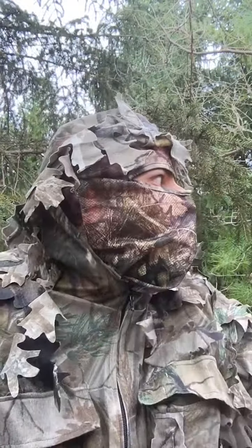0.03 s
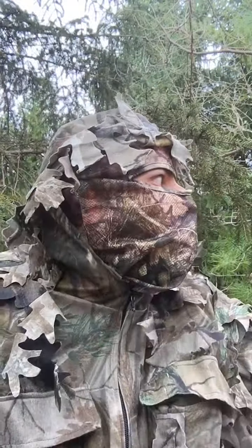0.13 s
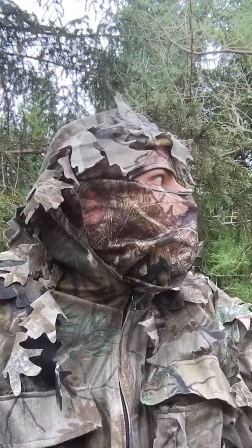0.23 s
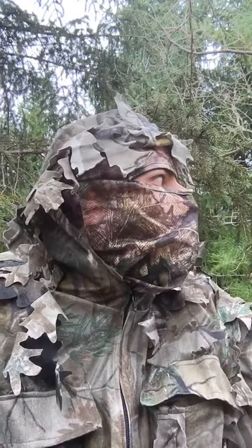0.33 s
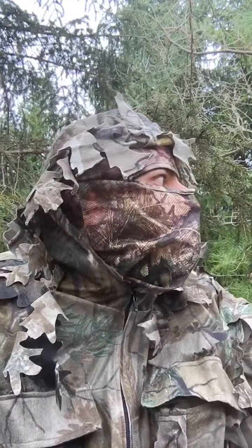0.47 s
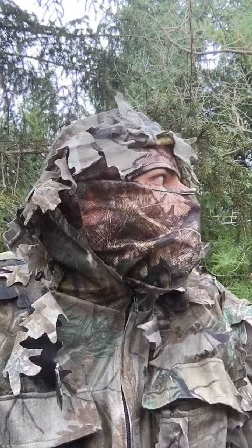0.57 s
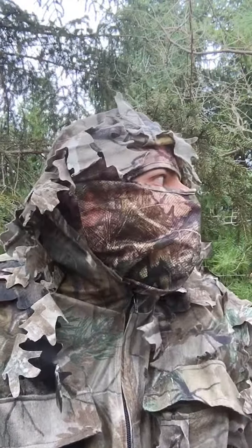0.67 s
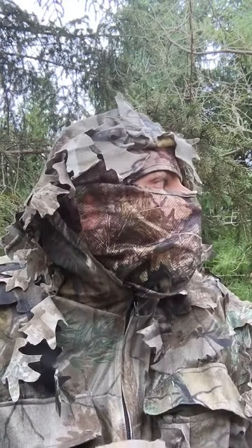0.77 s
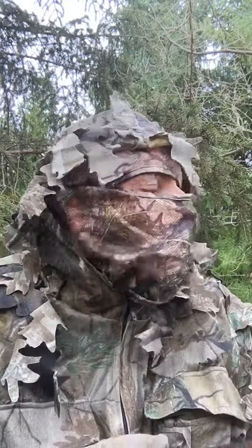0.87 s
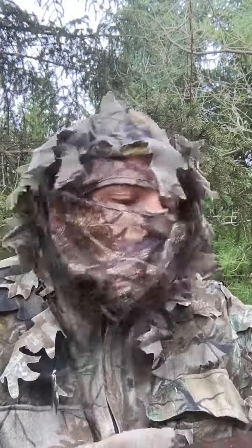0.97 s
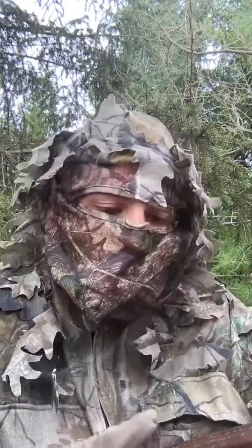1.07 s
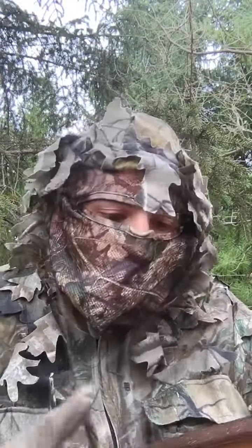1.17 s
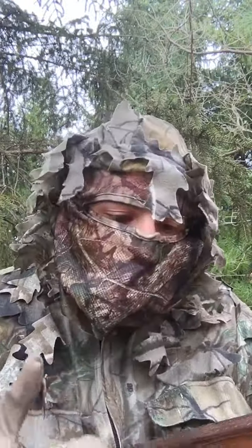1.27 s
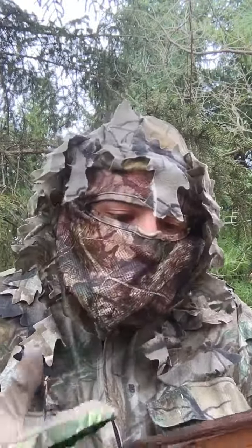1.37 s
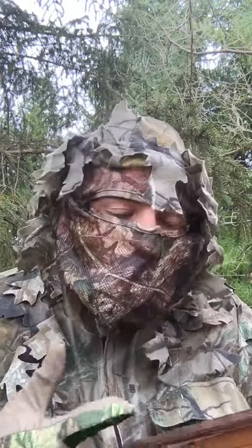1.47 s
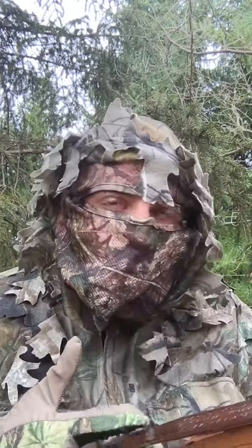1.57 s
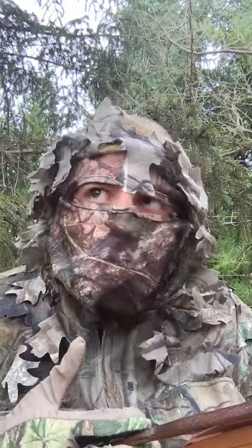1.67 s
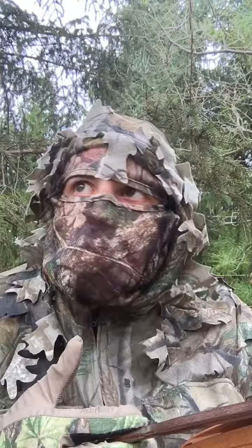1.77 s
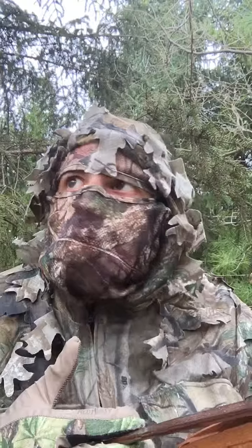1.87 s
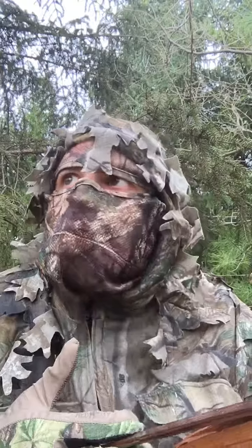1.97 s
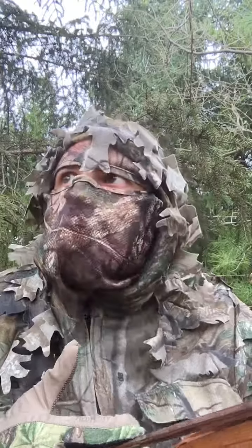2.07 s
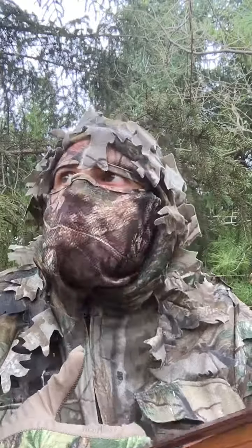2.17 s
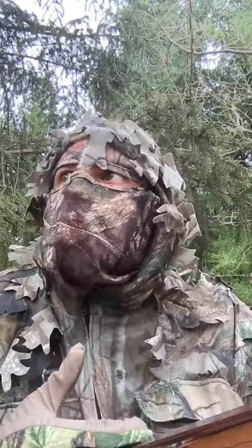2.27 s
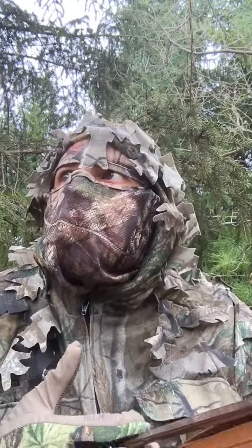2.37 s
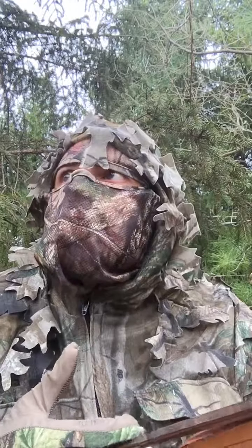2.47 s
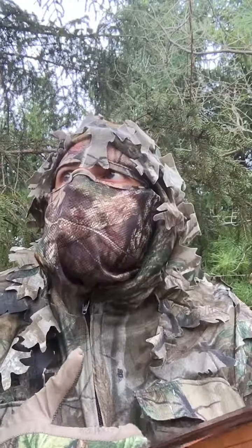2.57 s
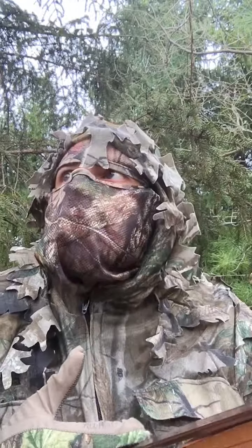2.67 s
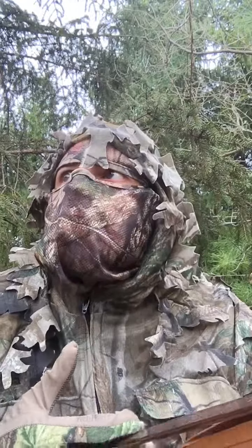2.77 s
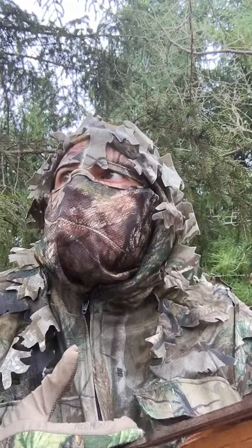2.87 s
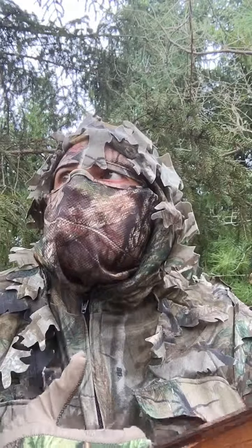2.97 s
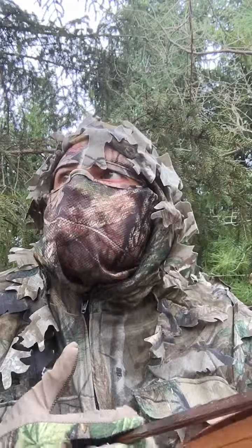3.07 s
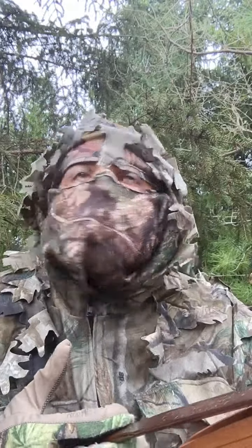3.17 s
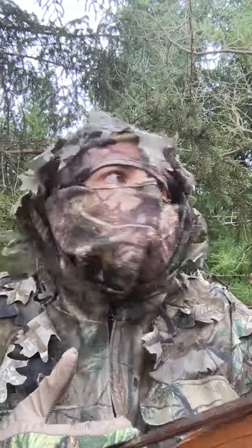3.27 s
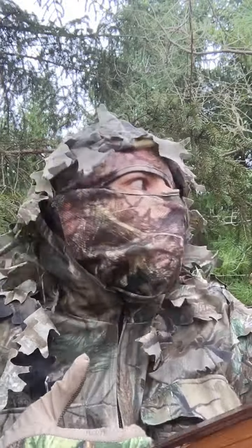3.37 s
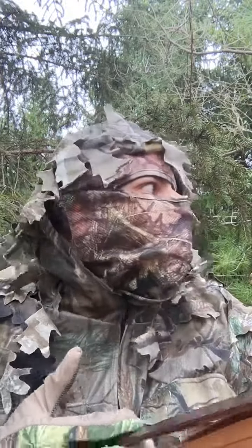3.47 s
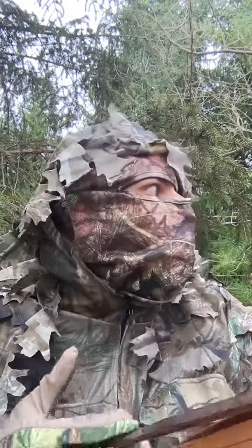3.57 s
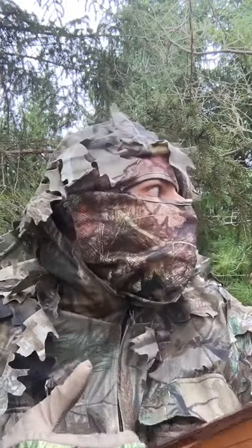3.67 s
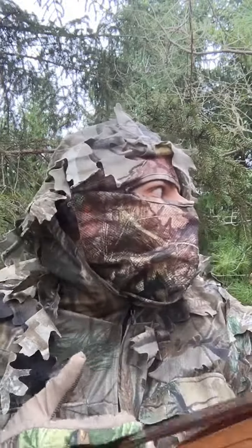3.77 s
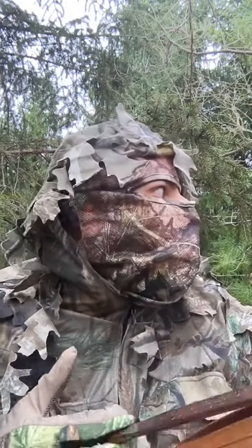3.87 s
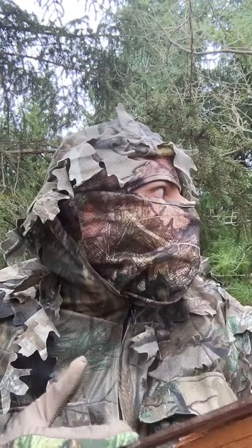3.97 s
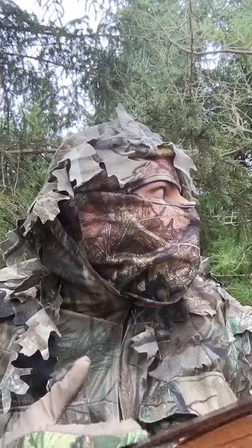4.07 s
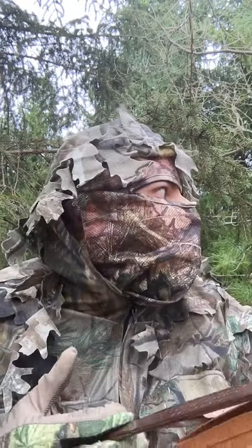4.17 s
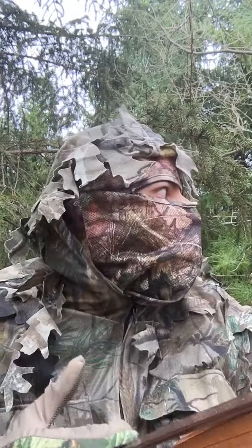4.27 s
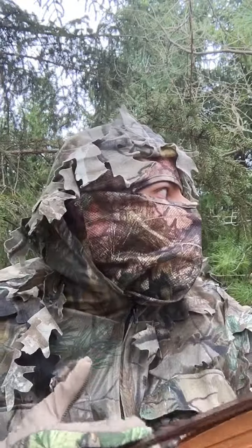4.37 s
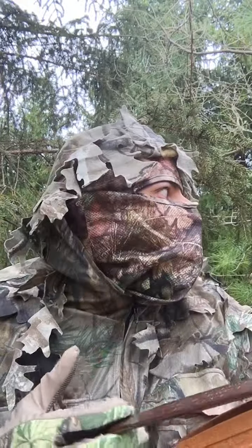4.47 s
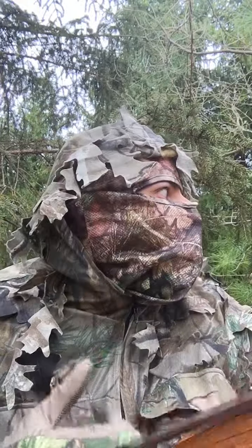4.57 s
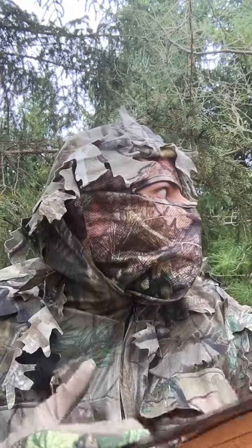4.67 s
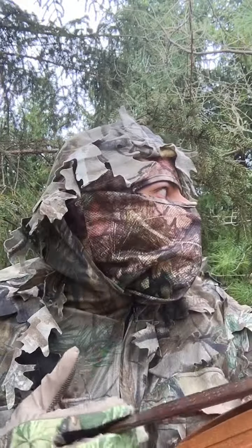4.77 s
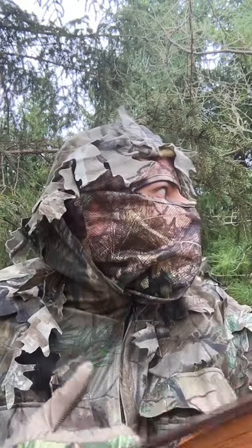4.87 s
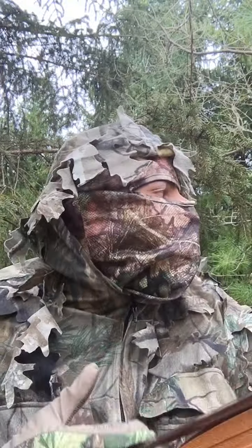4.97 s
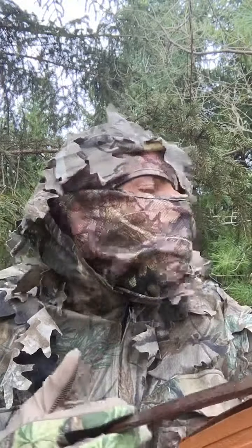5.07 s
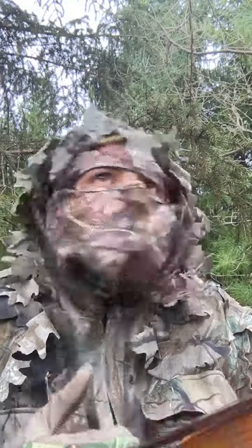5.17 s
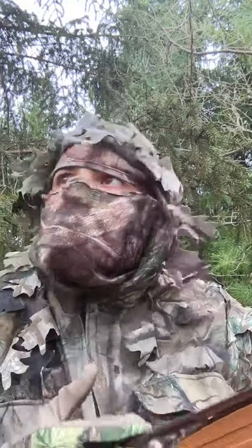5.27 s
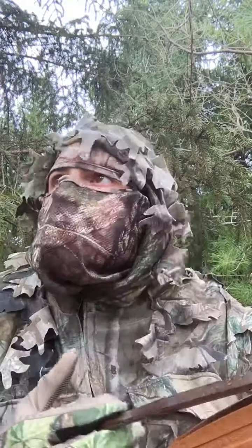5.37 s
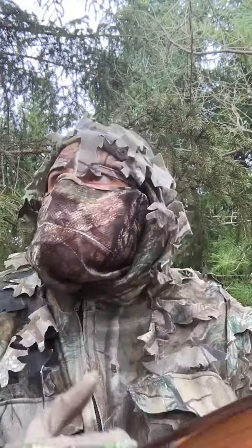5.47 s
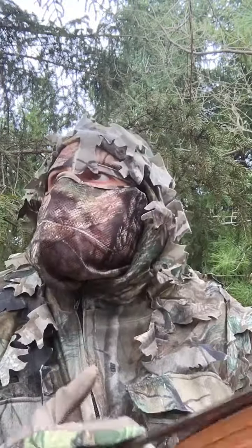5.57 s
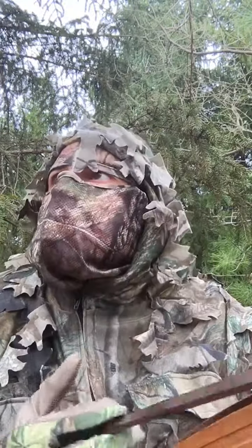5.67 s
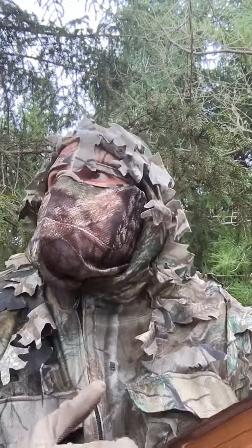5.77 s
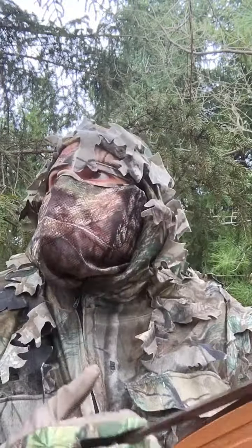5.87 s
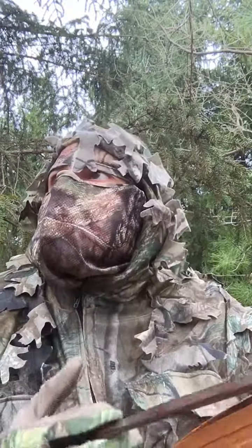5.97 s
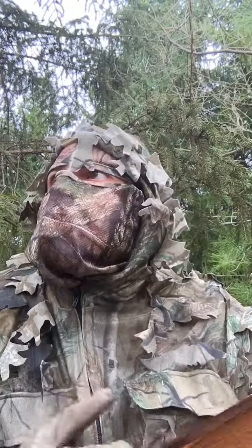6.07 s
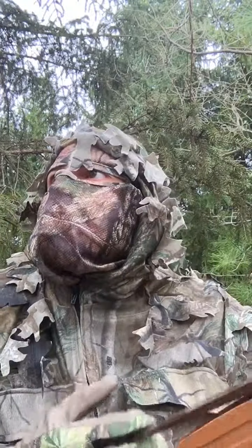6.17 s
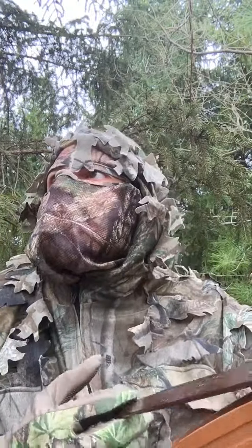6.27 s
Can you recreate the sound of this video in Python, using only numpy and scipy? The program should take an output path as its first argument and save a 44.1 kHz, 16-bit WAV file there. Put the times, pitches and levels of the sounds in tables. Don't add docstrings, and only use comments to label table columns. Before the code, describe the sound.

In a quiet wood, very close to the microphone, a wooden box call is handled: tiny dry creaks at its screw, then one light hollow tap. After a pause, small clicks lead into short chalky yelps like a hen turkey, weak at first, then loud and evenly spaced about three a second. Each starts with a woody knock and drops slightly in pitch. Faint echoes, low rumble and leaf hush surround them.

```python
import sys
import numpy as np
from scipy import signal
from scipy.fft import rfft, irfft, next_fast_len
from scipy.io import wavfile
from scipy.ndimage import uniform_filter1d, minimum_filter1d, map_coordinates

SR = 44100
rng = np.random.default_rng(int(sys.argv[2]) if len(sys.argv) > 2 else 0)


def field_ratio(decibels):
    return 10 ** (np.asarray(decibels, dtype=float) / 20)


def materialize(psi):
    bounded = np.clip(np.atleast_2d(psi).T, -1, 1)
    quanta = np.round(bounded * 32767).astype(np.int16)
    wavfile.write(sys.argv[1], SR, quanta)


N = 278182

# (start [s], length [s], time to the drop into the slow rate [s],
# fast slip rate [Hz], slow slip rate [Hz])
STROKES = [(2.304, .024, .009, 730, 632), (2.627, .102, .07, 772, 650), (3.0355, .042, .013, 735, 662),
           (3.395, .084, .042, 735, 676), (3.774, .026, .007, 810, 638), (4.088, .043, .008, 720, 674),
           (4.381, .054, .015, 735, 667), (4.676, .062, .045, 778, 650), (4.975, .063, .028, 755, 678),
           (5.265, .057, .022, 720, 662), (5.564, .064, .047, 775, 672), (5.842, .064, .035, 752, 668),
           (6.142, .059, .023, 740, 660)]
# (level [dB], roughness [0-1], edge [dB], cavity [dB], letting go [dB])
GRIPS = [(-14, 0.11, -8, -8.5, 12.5), (-12.5, .02, -5, -8.5, 5), (-8.5, .33, 1, -7.5, 14),
         (-9.5, 0, 10, -7.5, 7), (-7.5, 0.4, -1.5, -11, 14), (-8, .1, 8, -8, 13.5),
         (-8.5, 0.3, 4.5, -8.5, 8), (-6, 0, 6.5, -8.5, 10.5), (-7.5, .12, 8.5, -6, 21.5),
         (-5.5, .2, 5.5, -11, 20.5), (-6, 0.2, 7.5, -17.5, 19), (-7.5, 0.1, 7, -9, 19),
         (-8, .15, 1, -8, 18)]
# (frequency [Hz], width [Hz], level [dB])
SLIDING_MODES = [(683, 260, -7), (1328.3, 217, 6.5), (1694, 170, -2), (1870, 250, -2.5), (2332, 240, -0.5),
                 (2577, 160, -4), (3480, 190, 0), (3746, 130, 2.5), (4773, 120, -11), (5228, 260, -11),
                 (5877, 230, -8.5), (6500, 430, -17.5), (8210, 170, -18), (8910, 330, -22),
                 (11500, 960, -46.5)]
# (frequency [Hz], width [Hz], level [dB])
HELD_MODES = [(980, 83, -1.5), (1260, 150, 0), (1690, 77, 6.5), (2590, 230, -14.5), (2720, 41, -26),
              (3150, 130, -11), (3440, 40, -45), (4300, 900, -24), (5530, 310, -32.5), (5800, 210, -24),
              (8200, 1500, -70)]


def unit(x):
    return x / np.sqrt(np.mean(x ** 2) + 1e-20)


def along(points, hz):
    f, v = np.transpose(points)
    return np.interp(np.log(hz + 1), np.log(f + 1), v)


def smooth_rise(u, over):
    return (1 + np.tanh(u / over / 2)) / 2


def filtered(x, response):
    m = next_fast_len(N + SR // 2)
    return irfft(rfft(x, m) * response(np.fft.rfftfreq(m, 1 / SR)), m)[..., :N]


def modes(table):
    def response(f):
        total = 0
        for k, (center, width, db) in enumerate(table):
            resonance = 1j * f * width / (center * center - f * f + 1j * f * width)
            total = total + (-1) ** k * field_ratio(db) * resonance
        return total
    return response


def soft_top(response, corner_hz):
    return lambda f: response(f) / (1 + 1j * f / corner_hz) ** 2


def pulses(times, sizes):
    at = np.asarray(times) * SR
    index = np.floor(at).astype(int)[:, None] + np.arange(-7, 9)
    gap = index - at[:, None]
    shape = np.sinc(gap) * np.cos(np.pi * gap / 16) ** 2
    weighted = shape * np.asarray(sizes)[:, None]
    return np.bincount(index.ravel(), weighted.ravel(), N + SR)[:N]


def edged(soft, sharp, table, corner_hz):
    wood = modes(table)

    def high(f):
        return (1j * f / corner_hz / (1 + 1j * f / corner_hz)) ** 2
    low_part = filtered(soft, lambda f: wood(f) * (1 - high(f)))
    return low_part + filtered(sharp, lambda f: wood(f) * high(f))


def yelps():
    # (frequency [Hz], width [Hz], level [dB])
    cavity_modes = [(917, 88, 9.5), (860, 20, -15.5)]
    soft, sharp, deep, swing, gritty = np.zeros((5, N))
    for row, press in zip(STROKES, GRIPS):
        s, hz, db, rough, edge_db, cavity_db = stroke(row, press)
        t = np.arange(s[0], s[-1], 1 / SR)
        turns = np.cumsum(np.interp(t, s, hz)) / SR
        when = np.interp(np.arange(int(turns[-1]) + 1), turns, t)
        chance = rng.standard_normal((len(when), 3))
        r = np.clip(np.interp(when, s, rough), 0, 1)
        jitter = (0.006 + 0.3 * r ** 1.7) * chance[:, 0]
        when = when + jitter / np.interp(when, s, hz)
        size = field_ratio(np.interp(when, s, db) + 28.0) * np.abs(1 + 0.5 * r * chance[:, 1])
        slip_edge_db = np.interp(when, s, edge_db)
        soft += pulses(when, size)
        sharp += pulses(when, size * field_ratio(slip_edge_db + 5.1 * chance[:, 2] * r))
        gritty += pulses(when, size * field_ratio(slip_edge_db) * (0.25 + r))
        deep += pulses(when, size * field_ratio(np.interp(when, s, cavity_db)))

        steadiness = (1 - np.clip(np.interp(t, s, rough), 0, 1)) ** 2
        steadiness = steadiness * np.clip((s[-1] - t) / 0.0016, 0, 1)
        swing_size = field_ratio(np.interp(t, s, db - 1.3 * edge_db) - 2.5) * steadiness
        swing[round(s[0] * SR):][:len(t)] = swing_size * np.sin(2 * 2 * np.pi * turns + 1.35)

    drag = signal.lfilter([0.05], [1, -0.95], gritty)
    wall = edged(soft, sharp + 1.8 * drag * rng.standard_normal(N), SLIDING_MODES, corner_hz=3000)
    wall = filtered(wall, lambda f: 1 / (1 + (1j * f / 14000)) ** 2)

    def fizz_band(f):
        return field_ratio(-27.5) / (1 + (7000 / (f + 1)) ** 6) / (1 + (f / 12000) ** 4)
    fizz = filtered(drag * rng.standard_normal(N), fizz_band)
    cavity = filtered(deep, soft_top(modes(cavity_modes), corner_hz=2460))
    return wall + fizz + cavity + swing


def stroke(row, grip):
    # (time [s], step of the fast rate [Hz], duration [s], step of the edge [dB])
    catches = [
        (2.653, -48, .005, 3),
        (2.682, 25, .001, -2),
        (3.417, 48, .002, -4),
        (4.696, 88, .002, -11),
        (5.59, 15, .001, 0),
        (5.601, -30, .001, 3),
        (6.147, 45, .001, 0),
        (6.152, -45, .002, 8),
    ]
    start, length, drop_s, fast_hz, slow_hz = row
    db, rough, edge_db, cavity_db, _ = grip
    u = np.arange(0, length, 1 / SR)
    forming = np.exp(-u / length / 0.1)
    failing = np.exp(-((1 - u / length) / 0.16) ** 2)
    slow = smooth_rise(u - drop_s, 0.0022)
    dropping = 4 * slow * (1 - slow)
    shake = map_coordinates(rng.standard_normal((3, 40)), [np.arange(3)[:, None] + 0 * u, [u * 150] * 3])
    jump_s, jump_hz = 6.177, 990
    jumped = smooth_rise(start + u - jump_s, 0.0004)

    bite = 0
    catch_edge_db = 0
    fast_hz = fast_hz + 70 * np.exp(-u / 0.007)
    for s, step_hz, over, step_db in catches:
        if start < s < start + length:
            since = u - (s - start)
            fast_hz = fast_hz + step_hz * smooth_rise(since, over)
            catch_edge_db = catch_edge_db + step_db * smooth_rise(since, over)
            if step_hz > 0:
                bite = bite + np.exp(-(since / 0.003) ** 2)

    sagging_hz = slow_hz - 650 * (u - drop_s)
    hz = ((1 - slow) * fast_hz + slow * sagging_hz) * (1 + 0.01 * shake[0])
    hz = hz + (jump_hz - hz) * jumped
    db = db - 4.5 * forming - 10 * failing + 1.3 * shake[1] + 2 * bite
    rough = rough + 0.55 * forming + 0.1 * dropping + 0.4 * failing ** 2 + 0.25 * bite + 0.3 * jumped
    edge_db = edge_db + (1 - slow) * catch_edge_db
    edge_db = edge_db - 8.5 * forming - 3.5 * slow - 7.5 * failing + 2.5 * shake[2]
    cavity_db = cavity_db + 3 * forming + 4.5 * slow + 13 * failing - jumped
    return start + u, hz, db, rough, edge_db, cavity_db


def releases():
    # (frequency [Hz], width [Hz], level [dB])
    freed_modes = [(780, 120, -1), (1090, 33, 3.5), (1730, 90, -13), (2400, 210, -7.5), (3830, 220, -15.5),
                   (5760, 300, -25.5)]
    ends = np.array([row[0] + row[1] for row in STROKES])
    let_go_db = np.transpose(GRIPS)[-1]
    force = pulses(ends, field_ratio(let_go_db)) + pulses(ends + 0.006, field_ratio(let_go_db - 8))
    t = np.arange(SR // 20) / SR
    trickle = np.convolve(pulses(ends, field_ratio(let_go_db - 41)), 1 / (1 + (t / 0.011) ** 4))[:N]
    ring = filtered(force, soft_top(modes(freed_modes), corner_hz=8000))
    return ring + filtered(trickle * rng.standard_normal(N), modes(SLIDING_MODES))


def knocks():
    # (time
    # [s], peak level [dB], low mode [dB], edge [dB])
    slips = [(2.211, -26.5, 14, 1), (2.2241, -20.5, 19, -15.5), (2.246, -42, -10, 10),
             (2.6212, -27.5, 3.5, 0), (2.627, -10.5, -3, -2.5), (2.632, -6, -5, 6), (2.636, -6, -6.5, -0.5),
             (2.9902, -13, -0.5, 2.5), (2.995, -27, 13.5, 1), (2.9992, -1.5, 2, 8.5),
             (3.0364, -8.5, 2, 3.5), (3.3904, -13, -1.5, 5.5), (3.3959, 6, -2.5, 0),
             (3.7235, -6.5, 12.5, 8.5), (3.7328, 6.5, 10, -3), (4.0834, 1.5, 8.5, 5), (4.3808, -5, 2.5, 4),
             (4.671, 1.5, 6, -3.5), (4.9687, 1, 8, 2.5), (5.2639, -3.5, -3.5, 8), (5.561, 4, 1.5, -4.5),
             (5.839, -1.5, -8.5, -12.5), (6.136, -14.5, -8, 18.5), (6.141, 9, -17, -10)]
    s, db, low_db, edge_db = np.transpose(slips)
    decay = field_ratio(-60 * np.arange(SR // 40) / SR / 0.0082)
    tear = np.convolve(pulses(s, field_ratio(db + edge_db + 17)), decay)[:N]
    upper = edged(pulses(s, field_ratio(db + 31.5)), tear * rng.standard_normal(N), HELD_MODES[1:], corner_hz=2530)
    upper = filtered(upper, lambda f: 1 / (1 + 1j * f / 7000) ** 2)
    lower = filtered(pulses(s, field_ratio(db + low_db + 28.5)), soft_top(modes(HELD_MODES[:1]), corner_hz=3000))
    return upper - lower


def strain_hiss():
    starts = pulses([row[0] - 0.03 for row in STROKES[1:]], np.ones(len(STROKES) - 1))
    strain = np.convolve(starts, np.linspace(0, 1, 1100) ** 1.5)[:N]
    return field_ratio(-42) * strain * unit(filtered(rng.standard_normal(N), modes(HELD_MODES)))


def lid_tap():
    # (time [s], peak level [dB])
    blow = (1.6105, -23)
    # (frequency [Hz], width [Hz], level [dB])
    lifted_modes = [(690, 150, -14), (1000, 250, -13), (1270, 45, 0), (1600, 200, -6), (2080, 120, -10),
                    (2900, 200, -18), (3680, 150, -12), (5100, 300, -20), (6300, 400, -19),
                    (8000, 2000, -30)]
    ring = filtered(pulses([blow[0]], [1]), modes(lifted_modes))
    return field_ratio(blow[1]) * ring / np.abs(ring).max()


def creaks():
    # (time [s], peak level [dB], length [s])
    creeps = [(.51, -56, .004), (.5435, -41, .0015), (.5934, -51, .005), (.6074, -48, .005),
              (.7565, -53, .012), (.781, -49, .004), (.959, -48, .003), (.978, -43, .009), (1.0, -50, .003),
              (1.017, -43, .012), (1.031, -41, .007), (1.059, -35, .007), (1.067, -38, .025),
              (1.098, -38, .017), (1.123, -38, .003), (1.127, -41, .005), (1.583, -53, .008)]
    # (frequency [Hz], width [Hz], level [dB])
    screw_modes = [(830, 80, -6), (1200, 110, -4), (1900, 250, -9), (2860, 180, 0), (3400, 200, -1),
                   (4400, 500, -7), (5400, 250, -2), (6300, 500, -6), (10300, 3000, -20)]
    force = np.zeros(N)
    t = np.arange(2000) / SR
    for s, db, length in creeps:
        grit = rng.standard_normal((2, len(t)))
        burst = field_ratio(db + 4 * grit[1]) * grit[0] / (1 + (t / length) ** 4)
        force[round(s * SR):][:len(t)] += burst
    return field_ratio(4.5) * filtered(force, modes(screw_modes))


def echoes(x, t60_of, delay):
    hz, t, z = signal.stft(rng.standard_normal(SR), SR, nperseg=256)
    tail = signal.istft(z * field_ratio(-60 * t / t60_of(hz)[:, None]), SR, nperseg=256)[1]
    late = np.pad(x, (round(delay * SR), 0))
    return signal.fftconvolve(late, tail / np.linalg.norm(tail))[:N]


def bird():
    start_s, length_s, gap_s = 0.11, 0.031, 0.129
    start_hz, fall_hz_per_s = 6300, 71000
    t = np.arange(N) / SR
    u = t - start_s
    shape = np.clip(np.minimum(u, length_s - u) / 0.0046, 0, 1)
    shape = shape * (1 - np.exp(-((t - gap_s) / 0.0062) ** 2))
    return field_ratio(-62) * shape * np.sin(2 * np.pi * (start_hz * u - fall_hz_per_s * u ** 2 / 2))


def rush(spectrum, patchy_db):
    z = signal.stft(rng.standard_normal(N + SR), nperseg=512)[2]
    field = uniform_filter1d(rng.standard_normal(z.shape), 6, 0)
    field = uniform_filter1d(field, 14, 1)
    noise = signal.istft(z * field_ratio(patchy_db * unit(field)), nperseg=512)[1][:N]
    return unit(filtered(noise, lambda f: field_ratio(along(spectrum, f))))


def air():
    # (time [s], level [dB])
    rumble_levels = [(0, -56), (1.8, -58), (2.8, -60), (4.4, -62), (6.31, -65.5)]
    # (frequency [Hz], density [dB per Hz])
    rumble_spectrum = [(12, -48.5), (25, -9.5), (45, 3.5), (70, 0), (120, -4.5), (200, -16), (320, -25),
                       (600, -63.5)]
    # (time [s], level [dB])
    leaf_levels = [(1.75, -67.5), (2.43, -70), (3.14, -64.5), (6.31, -67.5)]
    # (frequency [Hz], density [dB per Hz])
    leaf_spectrum = [(120, -29), (200, -14), (350, -8.5), (500, -7.5), (800, -8.5), (1500, -10.5),
                     (2200, -13.5), (3500, -16.5), (6000, -19), (9000, -27), (13000, -33), (15500, -37)]
    t = np.arange(N) / SR
    rumble = field_ratio(np.interp(t, *np.transpose(rumble_levels))) * rush(rumble_spectrum, patchy_db=1.2)
    leaf_gain = field_ratio(np.interp(t, *np.transpose(leaf_levels)) + 1.5)
    return rumble + leaf_gain * rush(leaf_spectrum, patchy_db=1.5)


def scene():
    # (frequency [Hz], reverberation time t60 [s])
    trunk_decay = [(600, .35), (1300, .4), (1650, 1.0), (2300, .35), (4000, .25), (10000, .15)]
    box = yelps() + releases() + knocks() + strain_hiss() + lid_tap() + creaks()
    box = filtered(box, lambda f: (1j * f / 420 / (1 + 1j * f / 420)) ** 4)
    near = field_ratio(-27) * echoes(box, lambda hz: 0.055 + 0 * hz, delay=0.009)
    far = field_ratio(-51) * echoes(box, lambda hz: along(trunk_decay, hz), delay=0.03)
    return (box + near + far + bird() + air())[None]


def low_pass(x):
    return signal.sosfilt(signal.butter(12, 16360, fs=SR, output="sos"), x)


def record(dry):
    need = np.minimum(1, 1.08 / (np.abs(dry) + 1e-9))
    gain = minimum_filter1d(need, size=161, axis=1)
    gain = uniform_filter1d(gain, size=161, axis=1)
    held = dry * gain
    rounded = held / (1 + np.abs(held) ** 8) ** (1 / 8)

    def passband(f):
        low_cut = f ** 2 / (f ** 2 + 28 ** 2)
        top_cut = np.clip((15850 - f) / 250, 0, 1) / (1 + (f / 15000) ** 8)
        return low_cut * top_cut
    return low_pass(filtered(rounded, passband))


dry = scene()
out = record(dry)
materialize(out)
```